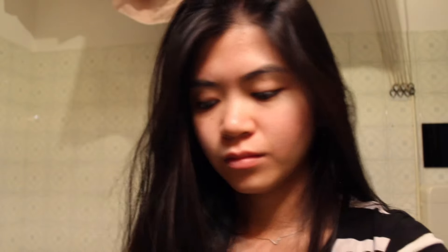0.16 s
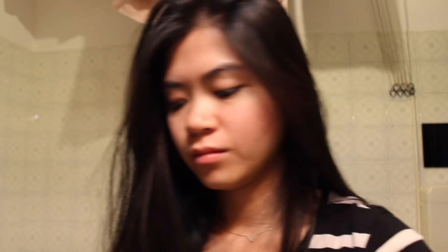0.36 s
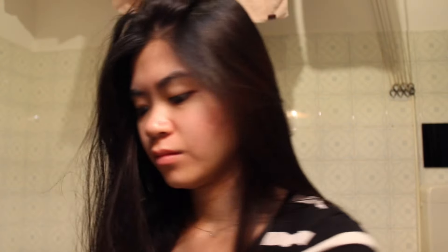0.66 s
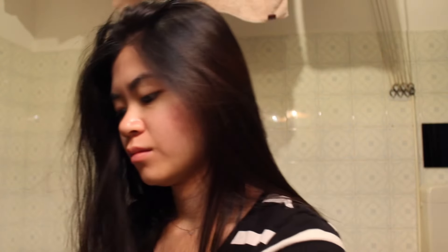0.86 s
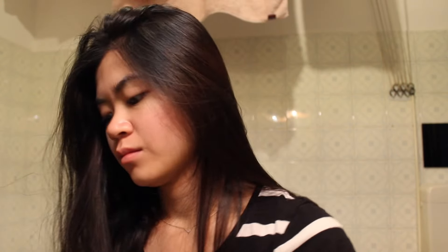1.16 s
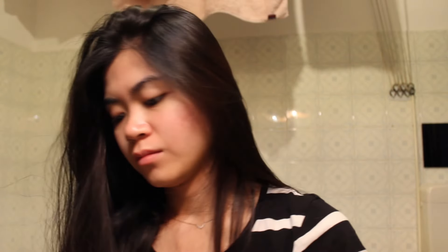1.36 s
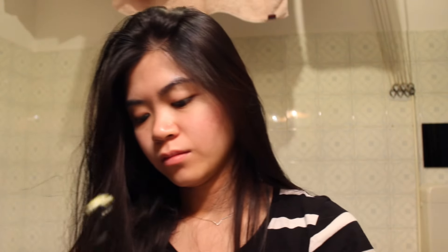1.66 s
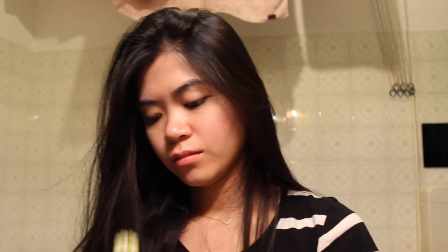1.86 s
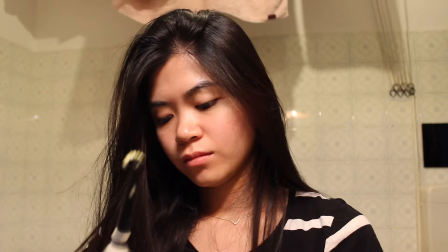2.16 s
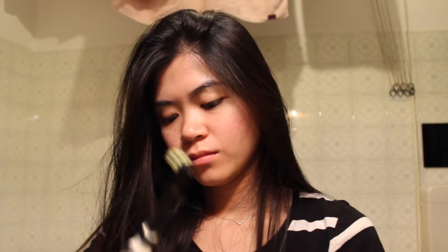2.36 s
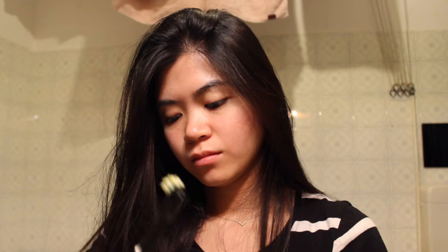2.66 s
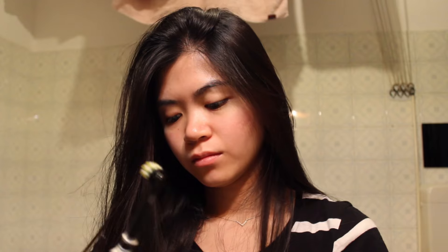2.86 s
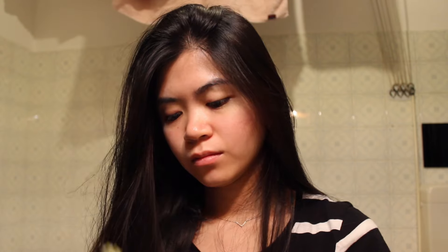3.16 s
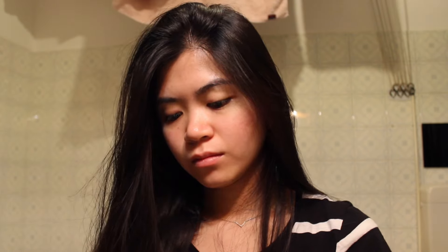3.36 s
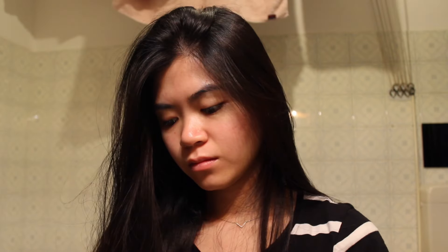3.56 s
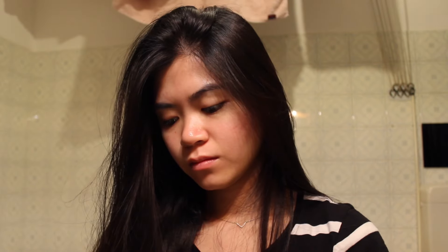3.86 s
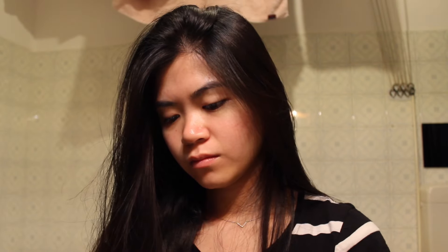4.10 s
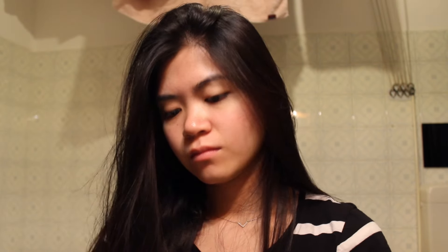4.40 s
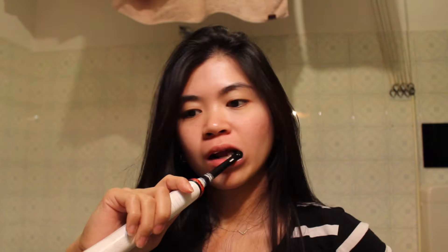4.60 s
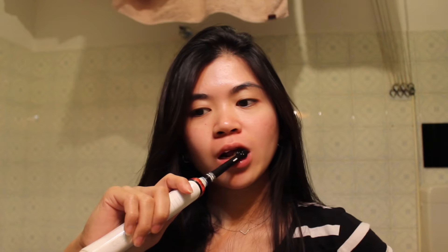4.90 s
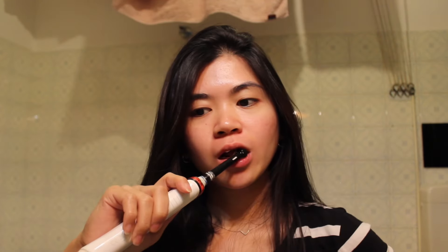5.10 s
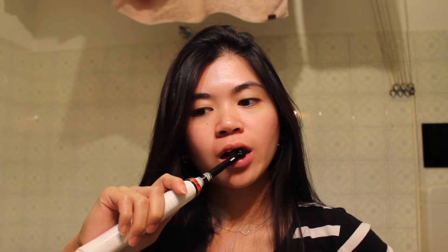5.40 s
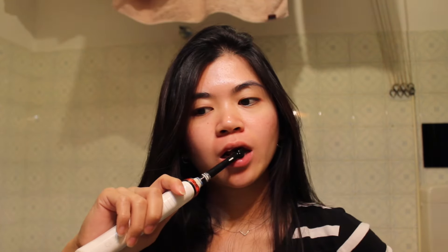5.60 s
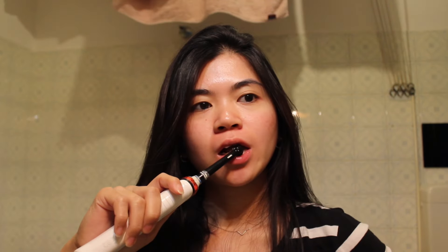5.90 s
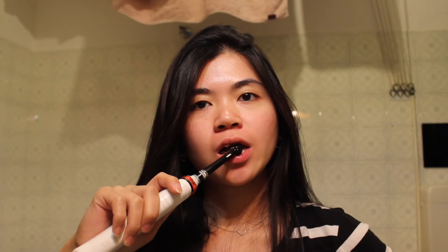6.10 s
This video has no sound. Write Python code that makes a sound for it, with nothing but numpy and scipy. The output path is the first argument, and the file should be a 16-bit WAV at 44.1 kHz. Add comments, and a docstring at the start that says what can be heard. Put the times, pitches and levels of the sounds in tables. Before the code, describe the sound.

Close microphone, hissy bathroom air with a short bright tiled echo. First comes a bumpy scrape with a little rattle, then scattered small taps, ticks and a sharper knock while hands shuffle and rustle. After a nearly still pause come a few more ticks, a switch click and the sudden coarse motor buzz of a toothbrush in a mouth, holding its pitch while its tone shifts slightly.

```python
"""Something is dragged along a shelf and set down in a small tiled bathroom, over microphone hiss.
Random slips ring the wall, the board and the thing; hands click, rustle and rub with brush and tube.
Then an electric toothbrush buzzes in a mouth: a geared motor swings the head, which knocks at both ends
of its swing; drive tones run along. A far door thuds near the end, as decaying low room modes."""
import sys
import numpy as np
from scipy import signal
from scipy.fft import rfft, irfft
from scipy.io import wavfile
from scipy.ndimage import uniform_filter1d

SR = 44100
rng = np.random.default_rng(int(sys.argv[2]) if len(sys.argv) > 2 else 0)


def transcribe(signal):
    """Save signal, clipped to [-1, 1], as a 16-bit WAV file at the path in sys.argv[1]."""
    frames = np.atleast_2d(signal).T
    limited = np.clip(frames, -1, 1)
    pcm = np.round(limited * 32767).astype(np.int16)
    wavfile.write(sys.argv[1], SR, pcm)


N = 275485
TIME = np.arange(N) / SR


def undb(db):
    """Amplitude factor of a level in dB."""
    return 10 ** (np.asarray(db) / 20)


def unit(x):
    """Scale to an RMS of 1."""
    return x / np.sqrt(np.mean(x ** 2))


def ring(x, modes):
    """Parallel resonances (Hz, width Hz, dB); alternating sign, so valleys do not cancel."""
    out = 0
    for k, (hz, width_hz, db) in enumerate(modes):
        b, a = signal.iirpeak(hz, hz / width_hz, SR)
        out = out + (-1) ** k * undb(db) * signal.lfilter(b, a, x)
    return out


def walk(rate_hz):
    """Random levels held 1 / rate_hz s, smoothed twice, RMS 1."""
    k = int(SR / rate_hz)
    steps = np.repeat(rng.standard_normal(N // k + 1), k)
    return unit(uniform_filter1d(uniform_filter1d(steps, k), k)[:N])


def slips(rate_hz, scatter_db):
    """Stick-slip: random ticks of either sign, a few much larger than the rest."""
    chance = rng.random((3, N))
    hit = chance[0] < rate_hz / SR
    size = undb(-scatter_db * np.log(chance[2] + 1e-9))
    return hit * np.sign(chance[1] - 0.5) * size


def stroke(start_s, hold_s, db, attack_s, fall_db_per_s):
    """Gain that rises linearly, holds, then falls exponentially."""
    t = TIME - start_s
    rise = np.clip(t / attack_s, 0, 1)
    return rise * undb(db - fall_db_per_s * np.maximum(t - attack_s - hold_s, 0))


def swell(middle_s, length_s, db):
    """Gain that rises and sinks smoothly."""
    return undb(db) * np.cos(np.pi * np.clip((TIME - middle_s) / length_s, -0.5, 0.5)) ** 2


# Noise spectrum. Each row: frequency in Hz, relative density in dB per Hz.
HISS_SPECTRUM = [(20, -30), (30, -13), (50, -11), (70, -11.5), (110, -2.5), (200, -9.5), (430, -7),
                 (800, -8), (1400, -10.5), (3100, -12.5), (6000, -16.5), (10800, -20.5), (14600, -18),
                 (15800, -22)]
HISS_DB, HISS_WAVER_DB = -44, 0.47


def hiss():
    """Microphone hiss and building hum: shaped noise, level wavering slightly."""
    hz, db = np.transpose(HISS_SPECTRUM)
    f = np.maximum(np.fft.rfftfreq(N, 1 / SR), 1)
    shape = undb(np.interp(np.log(f), np.log(hz), db))
    noise = unit(irfft(rfft(rng.standard_normal(N)) * shape, N))
    return undb(HISS_DB + HISS_WAVER_DB * walk(3.68)) * noise


# Tiled-room decay. Each row: band centre in Hz, 60 dB decay time in s.
ROOM_DECAY = [(250, 0.36), (1000, 0.46), (4000, 0.34), (12000, 0.15)]
ROOM_DB = -9


def room(x):
    """Tiles return a dense tail that loses its high treble first."""
    t = np.arange(SR // 2) / SR
    tail = 0
    for hz, t60_s in ROOM_DECAY:
        band = ring(rng.standard_normal(len(t)), [(hz, 1.65 * hz, 0)])
        tail = tail + band * undb(-60 * t / t60_s)
    tail = tail * np.clip((t - 0.003) / 0.019, 0, 1)  # builds up from 3 to 22 ms
    tail = tail / np.sqrt(np.sum(tail ** 2))
    return x + undb(ROOM_DB) * signal.fftconvolve(x, tail)[:N]


# Low room modes. Each row: frequency in Hz, level in dB, 60 dB decay time in s.
DOOR_MODES = [(95, -31.5, 0.95), (113.6, -32, 1), (136.2, -35, 1), (244, -32, 0.44)]
DOOR_S, DOOR_ATTACK_S = 5.91, 0.015


def door():
    """A soft blow through the walls rings the low modes of the room."""
    t = np.maximum(TIME - DOOR_S, 0)
    modes = sum(undb(db - 60 * t / t60_s) * np.sin(2 * np.pi * hz * t) for hz, db, t60_s in DOOR_MODES)
    return modes * (1 - np.exp(-t / DOOR_ATTACK_S))


# Hand and cloth moves. Each row: middle in s, length in s, low shuffle in dB, rustle in dB.
HAND_MOVES = [(1.45, 0.88, -58, -62), (1.925, 0.3, -49, -50.5), (2.213, 0.27, -46.5, -62),
              (2.405, 0.15, -64, -48), (2.547, 0.32, -57, -52.5), (2.857, 0.46, -60.5, -55),
              (3.445, 0.35, -57, -68), (3.855, 0.2, -71, -51.5), (4.165, 0.17, -56, -51.5),
              (4.33, 0.26, -50.5, -57)]
# Fingers rubbing plastic. Each row: middle in s, length in s, level in dB.
PLASTIC_RUBS = [(2.55, .2, -50), (2.83, .35, -50), (3.837, .15, -53)]
# Plastic resonance. Each row: frequency in Hz, width in Hz, gain in dB.
PLASTIC_MODES = [(3120, 610, 0)]
SHUFFLE_FLOOR_DB, RUSTLE_FLOOR_DB = -56.5, -63.5


def hands():
    """Shuffling lows, fine crackle of cloth and hair, fingers on plastic."""
    shuffle_gain = undb(SHUFFLE_FLOOR_DB) + sum(swell(s, length, db) for s, length, db, _ in HAND_MOVES)
    rustle_gain = undb(RUSTLE_FLOOR_DB) + sum(swell(s, length, db) for s, length, _, db in HAND_MOVES)
    rub_gain = sum(swell(*row) for row in PLASTIC_RUBS)
    shuffle = unit(ring(rng.standard_normal(N), [(178, 66, -2.5), (392, 190, -0.5)]))
    rustle = unit(ring(slips(4000, 2.1), [(3060, 3000, 17), (5540, 2800, -16), (11000, 7700, -14)]))
    rub = unit(ring(slips(900, 2.5), PLASTIC_MODES))
    return shuffle_gain * shuffle + rustle_gain * rustle + rub_gain * rub


# Clicks of plastic, glass and the switch; last, a sharp click where the buzz sets in. Each row: start in s,
# level in dB, centre in Hz, kind.
CLICK_EVENTS = [(0.217, -14.5, 3660, "ring"), (.283, -18, 5720, "ring"), (.30, -16, 6000, "ring"),
                (.349, -26, 7700, "ring"), (0.707, -28.5, 1830, "ping"), (.777, -35, 1950, "scuff"),
                (1.425, -19.5, 1610, "snap"), (1.611, -28, 2280, "ping"), (1.872, -34, 3200, "tick"),
                (2.178, -14, 2580, "knock"), (2.496, -25.5, 1500, "snap"), (2.508, -27.5, 2900, "tap"),
                (2.575, -24.5, 2000, "tap"), (2.608, -25.5, 3000, "tick"), (2.781, -27, 2830, "tick"),
                (2.817, -25.5, 2840, "tick"), (2.953, -30, 2600, "tick"), (2.991, -24.5, 6960, "snap"),
                (3.779, -30, 1800, "tick"), (3.803, -25.5, 2920, "tap"), (3.868, -23.5, 3430, "tick"),
                (3.916, -25.5, 2160, "tap"), (4.585, -23, 1690, "switch"), (4.612, -34, 1690, "switch"),
                (4.63, -11.5, 3000, "jerk")]
# Kinds of click; "jerk" is simply the sharp click where the buzz sets in. Each entry: width as share of centre,
# 60 dB decay time in s, then scratchy tail, crack and thump, each in dB re the click level.
CLICK_KINDS = {"ring": (0.7, 0.07, -9, -9, -21), "ping": (.07, 0.15, -10.5, -25, -10.5),
               "switch": (0.2, .04, -5, -14, -27), "tap": (0.45, 0.16, -13, -11, -17.5),
               "tick": (0.85, 0.11, -11.5, -11.5, -24), "knock": (1, 0.09, -11, -1, -9.5),
               "snap": (1.2, .045, -9, -4, -14.5), "jerk": (0.9, 1, -13.5, -15, -35),
               "scuff": (.25, 0.85, -9, -25, -4.5)}
CRACK_T60_S = 0.0018


def clicks():
    """Each click: a blow and its scratchy tail ringing in one band, a broad crack and a dull thump."""
    out = np.zeros(N + SR)
    t = np.arange(SR // 4) / SR
    for start_s, db, hz, kind in CLICK_EVENTS:
        share, t60_s, tail_db, crack_db, thump_db = CLICK_KINDS[kind]
        width_hz = share * hz
        noise = rng.standard_normal((3, len(t)))
        fade = undb(-60 * t / t60_s)
        blow = np.sin(2 * np.pi * hz * t) * np.exp(-np.pi * width_hz * t)
        scratch = ring(ring(noise[0], [(hz, width_hz, 0)]), [(hz, 1.1 * width_hz, 0)])
        tail = undb(tail_db) * unit(scratch) * fade
        crack = undb(crack_db) * np.diff(noise[1], prepend=0) * undb(-60 * t / CRACK_T60_S)
        thump = undb(thump_db) * unit(ring(noise[2], [(136, 67, -2.4), (404, 290, 0.42)])) * fade
        first = int(start_s * SR)
        out[first:first + len(t)] += undb(db) * (blow + tail + crack + thump)
    return out[:N]


# Pushes along the shelf. Each row: end of attack in s, hold in s,
# wall boom in dB, board rumble in dB, scrape in dB, squeal in dB.
SHELF_PUSHES = [(0, .14, -38.5, -25.5, -28.5, -36.5), (0.257, 0.028, -27, -27.5, -30.5, -54),
                (0.443, 0.3, -49, -46.5, -54.5, -66), (.775, 0.088, -31.5, -36.5, -55, -55)]
# Jolts of the board. Each row: start in s, rumble in dB.
BOARD_LURCHES = [(.05, -21), (.108, -19), (0.177, -18.5), (0.231, -27), (0.336, -27)]
# One squeal, one rattle. Each: start in s, hold in s, level in dB.
SQUEAK_EVENT = (0.205, 0.022, -27.5)
JINGLE_EVENT = (.281, 0.0045, -26)
# Resonances of wall, board and dragged thing. Each row: frequency in Hz, width in Hz, gain in dB.
WALL_MODES = [(110, 55, -3.5), (171, 81, 1.5)]
BOARD_MODES = [(204, 59, 0), (318, 194, 0.5), (486, 96, -1.5), (597, 97, -5.5)]
SCRAPE_MODES = [(930, 360, -0.5), (1350, 590, 3), (1940, 380, 5), (2720, 960, 0.5), (8650, 6200, -4)]
SQUEAL_MODES = [(3100, 280, -0.5), (3607, 190, 3.5), (4220, 450, -0.5), (5410, 460, -1)]
RATTLE_MODES = [(5780, 580, -3.5), (6760, 800, 1.5), (7000, 1000, 0)]
PUSH_ATTACK_S, LURCH_ATTACK_S, LURCH_HOLD_S = 0.015, 0.0066, 0.0056
WALL_FALL_DB_PER_S, BOARD_FALL_DB_PER_S, SCRAPE_FALL_DB_PER_S = 100, 118, 182
LURCH_FALL_DB_PER_S, SQUEAK_FALL_DB_PER_S = 502, 285
RATTLE_RE_SQUEAL_DB, SLIP_SCATTER_DB = -11, 2.22


def push_gain(column, fall_db_per_s):
    """Summed push strokes for one level column."""
    return sum(stroke(row[0] - PUSH_ATTACK_S, row[1], row[column], PUSH_ATTACK_S, fall_db_per_s)
               for row in SHELF_PUSHES)


def drag():
    """Dense slips shake the wall, the board and the dragged thing."""
    wall = push_gain(2, WALL_FALL_DB_PER_S)
    board = push_gain(3, BOARD_FALL_DB_PER_S)
    scrape = push_gain(4, SCRAPE_FALL_DB_PER_S)
    thin = push_gain(5, SCRAPE_FALL_DB_PER_S)
    board = board + sum(stroke(s, LURCH_HOLD_S, db, LURCH_ATTACK_S, LURCH_FALL_DB_PER_S)
                        for s, db in BOARD_LURCHES)
    squeal = thin + stroke(*SQUEAK_EVENT, 0.02, SQUEAK_FALL_DB_PER_S)
    rattle = undb(RATTLE_RE_SQUEAL_DB) * thin + stroke(*JINGLE_EVENT, 0.0026, SQUEAK_FALL_DB_PER_S)
    # gain, slips per second, resonances
    parts = [(wall, 590, WALL_MODES), (board, 880, BOARD_MODES), (scrape, 6020, SCRAPE_MODES),
             (squeal, 4080, SQUEAL_MODES), (rattle, 3020, RATTLE_MODES)]
    out = 0
    for gain, rate_hz, modes in parts:
        out = out + gain * unit(ring(ring(slips(rate_hz, SLIP_SCATTER_DB), modes), modes))
    return out


BUZZ_FROM_S = 4.6295
SWING_HZ, SHAFT_HZ = 61.85, 280.6  # nominal


def drive_turn():
    """Running angle for 1 Hz; load makes the speed waver."""
    return 2 * np.pi * np.cumsum(1 + 0.0015 * walk(6)) / SR


# Steady tones of the drive. Each row: multiple of shaft speed, multiple of swing rate, mean RMS level in dB.
DRIVE_TONES = [(0, 3, -58), (0, 4, -52), (0, 5, -46), (0, 6, -49), (0, 7, -42), (0, 8, -46), (0, 9, -39),
               (0, 10, -40), (0, 11, -43), (0, 12, -38), (0, 13, -44), (0, 14, -51), (0, 15, -44),
               (0, 16, -44), (0, 17, -36), (0, 18, -43), (0, 19, -39), (0, 20, -40), (0, 21, -47),
               (0, 25, -47), (0, 26, -40), (0, 27, -39), (0, 28, -41), (0, 29, -41), (0, 30, -38),
               (0, 33, -38), (0, 37, -40), (0, 54, -40), (1, -1, -54), (1, 0, -40.5), (1, 1, -49),
               (1, 2, -42), (1, 3, -50), (1, 4, -49), (1, 5, -47), (1, 6, -46), (1, 7, -53), (2, -3, -54),
               (2, -1, -47), (2, 1, -41), (2, 3, -40)]
WHINE_TEETH, WHINE_RMS_DB = 43, -52
TONE_WAVER_DB = 1.93


def tones(turn):
    """Each drive tone swells and slips in phase alone, the high ones slip more; a gear whine on top."""
    out = undb(WHINE_RMS_DB) * np.sin(WHINE_TEETH * SHAFT_HZ * turn + 0.97 * walk(40))
    for shaft_multiple, swing_multiple, db in DRIVE_TONES:
        hz = shaft_multiple * SHAFT_HZ + swing_multiple * SWING_HZ
        slip_rad = hz / 2500 * walk(25)
        start_rad = 2 * np.pi * rng.random()
        out = out + undb(db + TONE_WAVER_DB * walk(14)) * np.sin(hz * turn + start_rad + slip_rad)
    return np.sqrt(2) * out * (TIME >= BUZZ_FROM_S)  # sqrt(2): RMS to peak


# Handle, neck and mouth. Each row: frequency in Hz, width in Hz, gain in dB.
BODY_MODES = [(290, 170, -15.5), (704, 140, -7), (1090, 176, -4.5), (1867, 444, -2), (2193, 334, -2),
              (3086, 416, 1), (4544, 460, -0.5), (5670, 880, -7.5), (8350, 1040, -14.5),
              (10940, 1800, -18.5)]
# Bristles. Each row: frequency in Hz, width in Hz, gain in dB.
BRISTLE_MODES = [(13750, 800, -18), (15600, 900, -20)]
# Head ringing on teeth. Each row: start in s, ring level in dB.
TOOTH_TAPS = [(4.637, -32), (4.705, -25), (4.835, -31.5), (4.867, -31), (4.932, -22), (4.965, -31),
              (5.178, -36), (5.222, -36)]
# Mouth opens wider and rings hollow. Each row: middle in s, length in s, ring level in dB.
MOUTH_OPENINGS = [(4.724, .3, -26.5), (4.86, 0.12, -30), (5.74, 0.12, -28), (5.83, 0.068, -36)]
CHATTER_DB, CHATTER_WAVER_DB = -19.5, 0.35
TEETH_FIRST_DB, TEETH_FALL_DB_PER_S = -33.5, 21
TAP_ATTACK_S, TAP_FALL_DB_PER_S = 0.004, 703
HOLLOW_FLOOR_DB = -35
JOINT_DECAY_S = 0.0005


def swing_knocks(turn):
    """Head stops at both ends of the swing: late by a few samples, one end harder, sizes scattered."""
    ends = np.flatnonzero(np.diff(np.floor(turn * SWING_HZ / np.pi)))
    chance = rng.standard_normal((2, len(ends)))
    size_db = -4 * (np.arange(len(ends)) % 2) + 1.8 * chance[1]
    late = np.abs(6.0 * chance[0]).astype(int)
    knocks = np.zeros(N + 99)
    knocks[ends + late] = undb(size_db)
    return unit(knocks[:N])


def gear_grit(turn):
    """Gear noise; the same teeth meet at the same place of every swing, so part repeats."""
    place = (turn * SWING_HZ / (2 * np.pi) % 1 * SR / SWING_HZ).astype(int)
    return rng.standard_normal(N) + 0.36 * rng.standard_normal(SR)[place]


def toothbrush(turn):
    """A knock at each end of the swing, gear chatter in between, through body, teeth and mouth."""
    knocks = swing_knocks(turn)
    grit = gear_grit(turn)
    # play in the joint lets every knock rattle on, most plainly in the treble
    shake = unit(signal.lfilter([1], [1, -np.exp(-1 / (JOINT_DECAY_S * SR))], knocks))
    low = unit((2.76 + shake) * grit) + undb(-15) * knocks
    high = unit((1.64 + shake) * grit) + undb(-14) * knocks
    buzz = unit(ring(low, BODY_MODES[:8]) + ring(high, BODY_MODES[8:] + BRISTLE_MODES))

    sizzle = [(7930, 530, 0)]
    teeth = unit(ring(ring(knocks * undb(4 * walk(40)) + 0.3 * grit, sizzle), sizzle))
    hollow = unit(ring(knocks + grit, [(1655, 146, 0)]))

    buzz_gain = undb(CHATTER_DB + CHATTER_WAVER_DB * walk(8))
    # the ring on teeth fades once the buzz is heard
    teeth_gain = undb(TEETH_FIRST_DB - TEETH_FALL_DB_PER_S * (TIME - BUZZ_FROM_S))
    teeth_gain = teeth_gain + sum(stroke(s, 0, db, TAP_ATTACK_S, TAP_FALL_DB_PER_S) for s, db in TOOTH_TAPS)
    hollow_gain = undb(HOLLOW_FLOOR_DB) + sum(swell(*row) for row in MOUTH_OPENINGS)
    out = buzz_gain * buzz + teeth_gain * teeth + hollow_gain * hollow
    return out * (TIME >= BUZZ_FROM_S)


def scene():
    """Brush, drag, clicks and hands excite the room; tones, door and hiss bypass it."""
    turn = drive_turn()
    in_room = room(toothbrush(turn) + drag() + clicks() + hands())
    return (in_room + tones(turn) + door() + hiss())[None]


TOP_HZ, OFFSET = 15740, 0.0042


def record(dry):
    """The microphone chain cuts the top steeply and adds a small constant offset."""
    low_pass = signal.ellip(10, 0.2, 60, TOP_HZ, fs=SR, output="sos")
    return signal.sosfilt(low_pass, dry) + OFFSET


dry = scene()
out = record(dry)
transcribe(out)
```